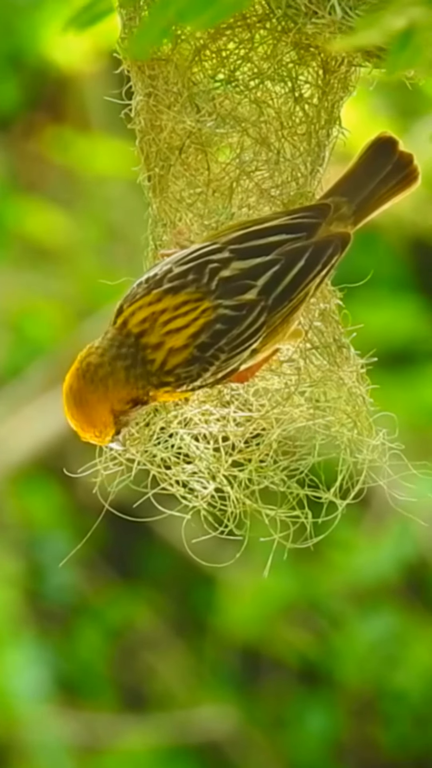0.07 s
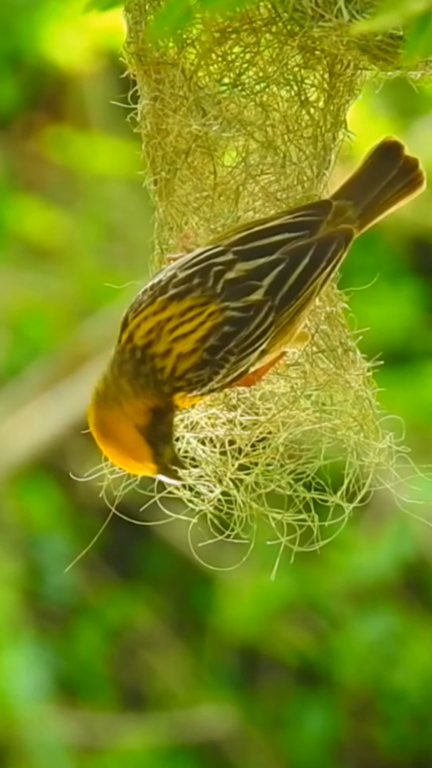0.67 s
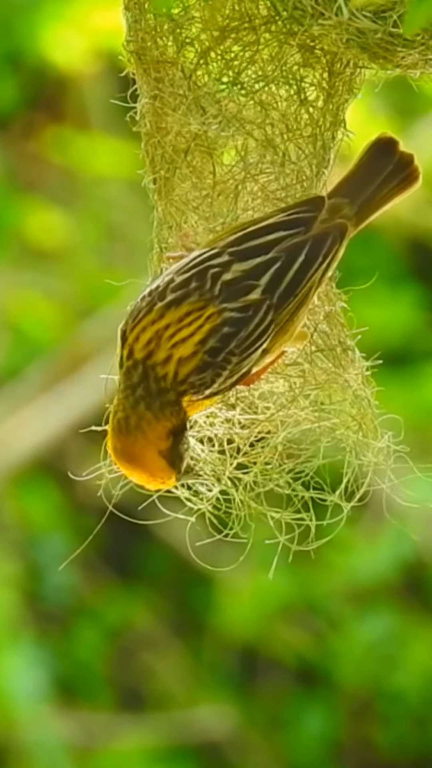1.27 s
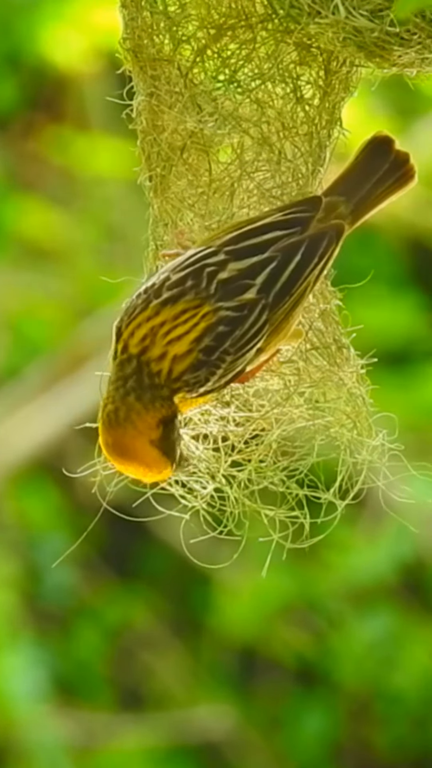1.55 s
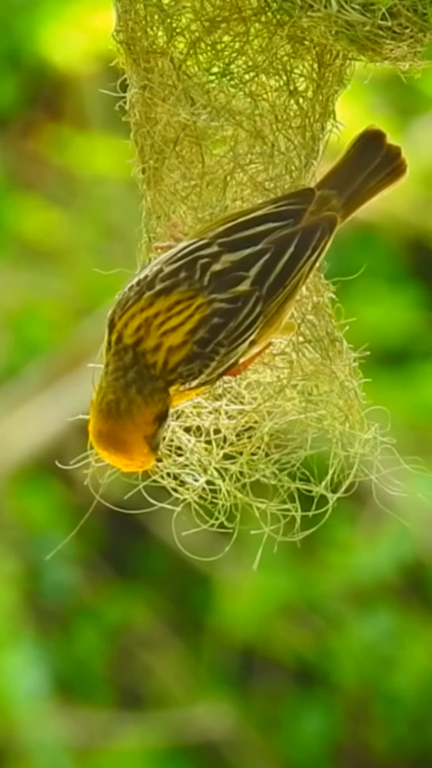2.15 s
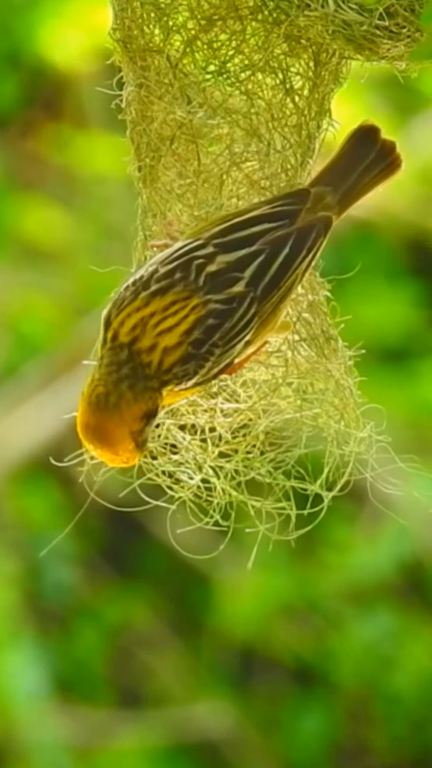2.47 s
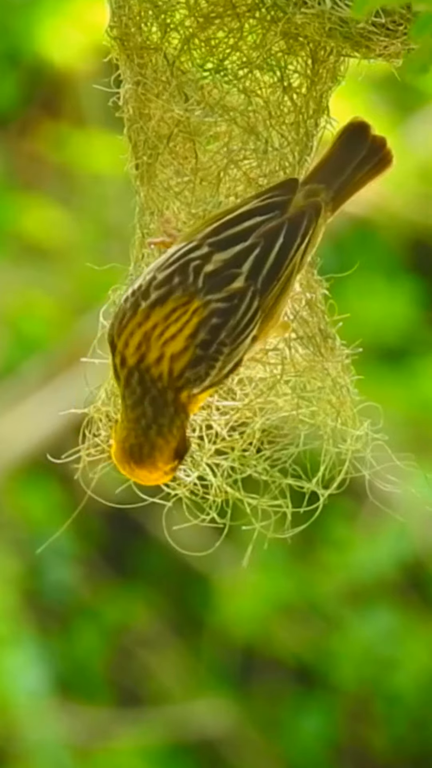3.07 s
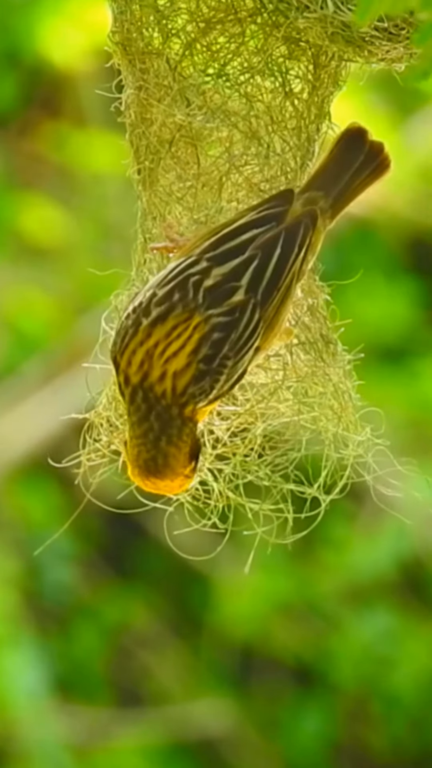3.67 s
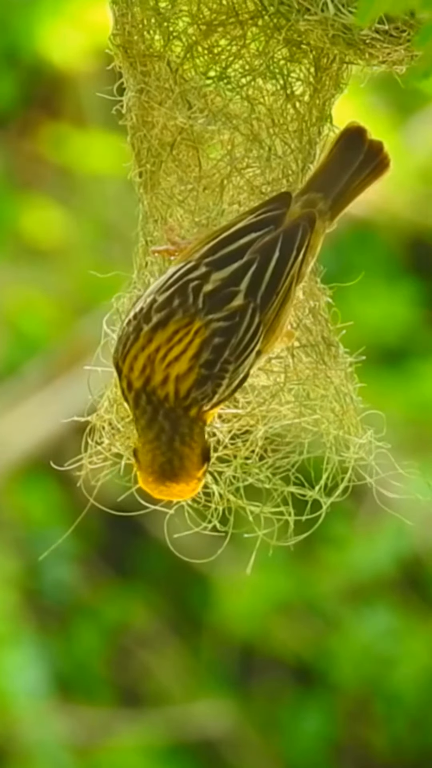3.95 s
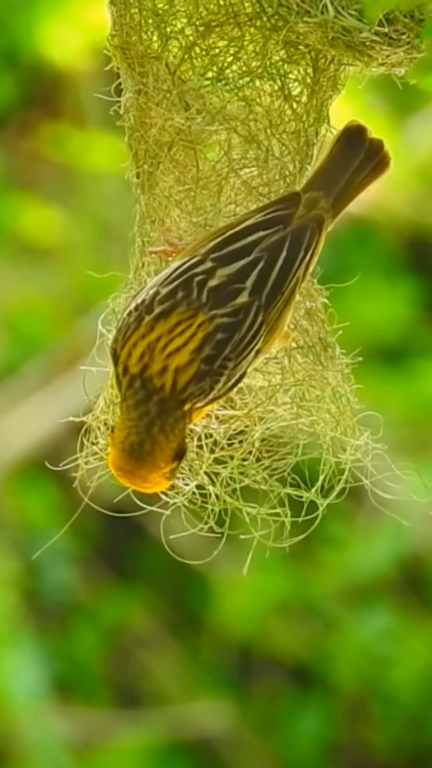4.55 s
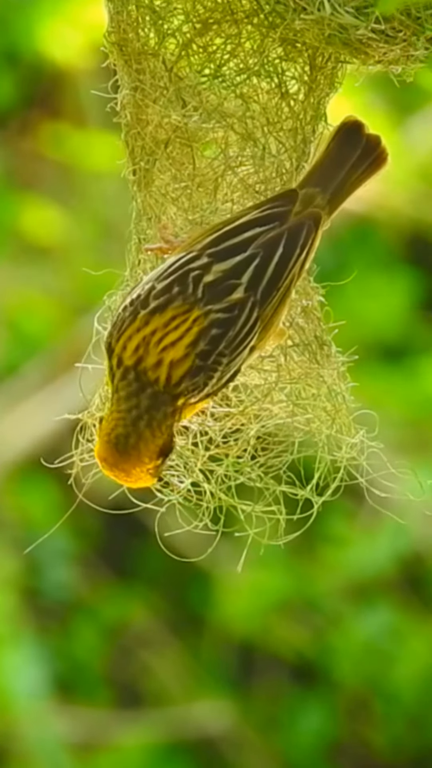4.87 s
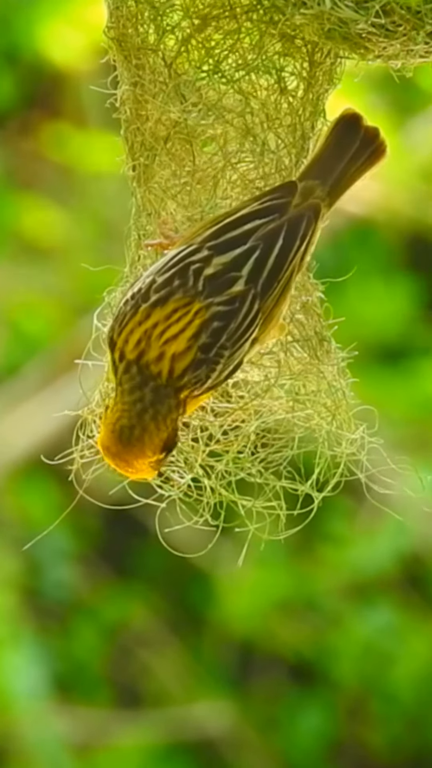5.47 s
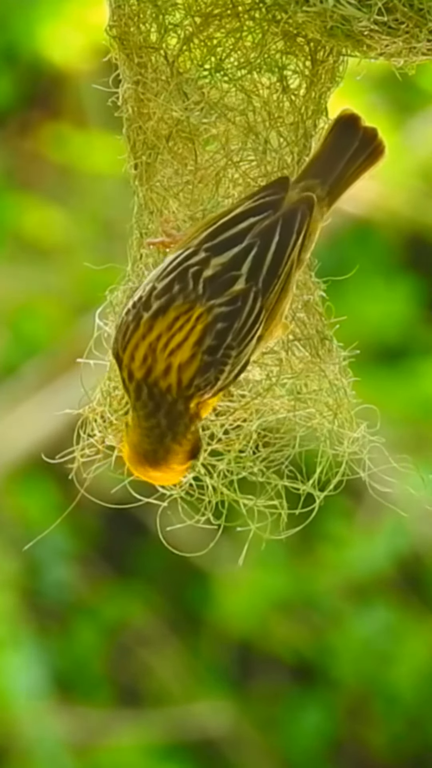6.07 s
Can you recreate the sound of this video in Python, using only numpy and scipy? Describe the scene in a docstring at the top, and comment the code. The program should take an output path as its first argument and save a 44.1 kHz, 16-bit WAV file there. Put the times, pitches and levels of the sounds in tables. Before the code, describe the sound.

Near bird whistles and trills, pauses for softer distant twitters, then sings sliding whistles with two short buzzes outdoors.

```python
"""A garden, the microphone close to a weaver bird at its hanging nest. Over faint open air, a distant
engine, far hoots and an insect ticking in bouts, the bird opens with slurred whistles and a fast trill,
then three hooked notes and a held one. Grass and leaves scatter each note; distant trees ring on.
After a pause come soft twitters and a low rattle from farther off. The second phrase is whistles again,
with two buzzy notes midway, where the two sides of the syrinx beat against each other."""
import sys
import numpy as np
from scipy import signal
from scipy.fft import rfft, irfft, next_fast_len
from scipy.io import wavfile
from scipy.ndimage import uniform_filter1d, map_coordinates

SR = 44100
rng = np.random.default_rng(int(sys.argv[2]) if len(sys.argv) > 2 else 0)


def pcm_store(signal):
    """Save signal as 16-bit PCM."""
    levels = np.round(np.clip(np.atleast_2d(signal), -1, 1) * 32767)
    wavfile.write(sys.argv[1], SR, levels.astype(np.int16).T)


N = 278271
U = np.linspace(0, 1, 41)  # progress through a note; a "place" is a point on this 0-1 scale

# Spectrum of the open air. Each row: frequency in Hz, relative level in dB.
AIR_SPECTRUM = [(13, -20), (24, 2.5), (55, -4.5), (120, -8), (180, -10), (280, -12), (640, -13.5),
                (800, -17), (1100, -20), (2500, -19), (4000, -27.5), (6000, -31.5), (10000, -39),
                (14000, -36.5), (15700, -65.5)]
# Hum of a distant engine. Each row: frequency in Hz, rms level in dB.
ENGINE_ORDERS = [(67.5, -70), (101, -67), (135, -70)]
# Ring of the foliage nearby and of the distant trees. Each row: frequency in Hz, seconds to fall 60 dB.
FOLIAGE_DECAY = [(1500, 0.19), (3000, 0.27), (6000, 0.26), (12000, 0.19)]
TREE_DECAY = [(1500, 1.7), (4000, 1.71), (7000, 1.15), (12000, 0.6)]
# Hoots of a far bird. Each row: start in seconds, relative level in dB.
HOOTS = [(.16, -60.5), (.31, -59), (.86, -59.5), (1.15, -61), (1.93, -64), (2.09, -61), (2.57, -60),
         (3.01, -61.5)]
# Bouts of insect ticking. Each row: start in seconds, end in seconds.
INSECT_BOUTS = [(0, 0.33), (1.2, 1.56), (1.994, 2.14), (2.426, 2.7), (2.946, 3.6), (4.173, 4.6),
                (5.448, 5.67), (6.02, 6.6)]
# A faint 4.6 kHz ring lingering from an earlier note, then soft twitters farther off.
# Each row: start and length in seconds, first and last pitch in Hz, relative level in dB.
SOFT_NOTES = [(0, 0.11, 4600, 4450, -60), (0.369, .016, 2820, 1940, -47.5),
              (0.643, .022, 2750, 1794, -49.5), (2.729, 0.041, 1750, 2370, -53),
              (2.786, 0.022, 4040, 3150, -59), (2.836, 0.035, 3900, 2890, -54),
              (2.859, 0.054, 1613, 2810, -50.5), (2.969, 0.026, 3950, 3580, -58.5),
              (2.998, 0.042, 1567, 2577, -48), (3.108, 0.047, 5240, 6920, -53.5),
              (3.227, 0.025, 2540, 1583, -49), (3.471, 0.055, 3400, 3246, -51.5),
              (3.555, 0.041, 4000, 2525, -54), (3.576, 0.036, 6040, 5010, -53),
              (3.622, 0.049, 4150, 2510, -55.5), (3.28, 0.23, 1940, 1818, -61),
              (3.486, .02, 1344, 1237, -53.5)]
# Runs of the rattle. Each row: start, end and stroke period in seconds, relative level in dB.
RATTLE_RUNS = [(3.051, 3.16, .0307, -44.5), (4.243, 4.53, .02725, -39)]
# The fall of one rattle stroke: four pitches in Hz.
RATTLE_STROKE_HZ = [2686, 2260, 1963, 1420]

# How the near bird's beak passes overtones and rasp. Each row: frequency in Hz, gain in dB.
BEAK_RESPONSE = [(1000, -34), (3000, -19), (6500, -3.5), (8000, -10), (9500, -5.5), (11000, -0.5),
                 (13000, 4.5), (15500, -10.5)]
# Two buzzes, a row for each side of the syrinx. Each row: start and length in seconds, top of the arch
# in Hz, its flatness, its upward lean as a share of pitch, relative level in dB.
BUZZ_VOICES = [(4.593, .084, 6090, 5.6, .11, -28.5), (4.599, 0.08, 4803, 3.4, 0.017, -30),
               (4.852, .072, 6230, 6, .05, -31.5), (4.859, 0.064, 5104, 3.3, .03, -29)]
# A trill syllable, a row for each side of the syrinx. Each row: delay and length in seconds,
# five evenly spaced pitches in Hz, four evenly spaced relative levels in dB.
TRILL_SYLLABLE = [(-.001, .0095, 3340, 4300, 5010, 5390, 6620, -9, 2, 0.91, -11.5),
                  (.0068, .015, 3810, 4696, 4280, 3214, 2230, 6, -0.5, 3.4, -15.5)]
# Single whistled glides. Each row: start and length in seconds, first and last pitch in Hz,
# steepest place, relative level in dB, loudest place.
SLURS = [(.01, 0.032, 2800, 1680, 0.63, -23.5, 0.46), (0.044, 0.03, 2010, 3015, 0, -22, 0.56),
         (3.778, 0.012, 6170, 3100, 0.62, -36, 0.75), (4.004, 0.01, 2580, 3160, .4, -29.5, 0.9),
         (4.012, 0.046, 2596, 4080, 0.67, -16.5, 0.49), (4.102, 0.048, 2570, 4060, 0.53, -17, 0.4),
         (4.976, .038, 3770, 2050, .47, -17.5, 0.35), (5.026, .034, 3790, 1986, 0.34, -18.5, 0.49),
         (5.227, 0.042, 3430, 2000, 0.5, -18.5, 0.36), (5.421, 0.043, 3520, 1946, 0.46, -19, 0.4)]
# Whistles that sink and recover. Each row: start and length in seconds, first, lowest and last pitch
# in Hz, lowest place, relative level in dB, loudest place, fade in dB.
DIPS = [(3.29, .105, 4520, 3340, 4054, .43, -32, 0.16, 2),
        (3.653, .027, 7100, 6460, 7950, 0.4, -37, 0.48, 13),
        (3.69, .027, 6850, 6760, 7500, 0.6, -36, 0.4, 9),
        (3.851, 0.086, 2514, 1260, 1280, .96, -22, .33, 29.5),
        (5.71, .08, 4440, 2950, 3320, .5, -20, 0.23, 11)]
# Low wavy whistles. Each row: start and length in seconds, centre pitch in Hz, swing as a share of it,
# highest place, number of cycles, relative level in dB.
WARBLES = [(0.109, .045, 1743, 0.2, 0.6, 0.86, -26), (3.499, .045, 1619, 0.167, .6, 0.46, -34),
           (5.524, .051, 1620, 0.115, .56, 1.32, -28.5), (5.61, 0.052, 1562, .13, 0.65, 1.4, -31)]
# The held note that ends the first phrase. Each row: time in seconds, pitch in Hz, relative level in dB.
LEDGE_PATH = [(1.146, 5688, -24.5), (1.154, 4450, -27.5), (1.16, 4130, -25), (1.178, 4355, -31),
              (1.19, 4050, -32), (1.204, 3250, -32), (1.212, 3050, -32)]
# A hook drops, then rises; a whip holds, then flicks down. Each row: delay and length in seconds,
# first and last base pitch in Hz, steepest place, relative level in dB, loudest place.
HOOK_GLIDES = [(0, .013, 3264, 1885, 0.15, 1, 0.15), (.018, .032, 1638, 2208, 0.49, -2, 0.7)]
WHIP_GLIDES = [(0, 0.032, 3970, 4073, 0.43, 0.69, 0.82), (0.0477, .026, 7580, 4190, .06, -2.25, 0.49)]
# Where hooks and whips are sung. Each row: start in seconds, pitch factor, relative level in dB.
HOOK_REPEATS = [(.871, 1.004, -23.5), (.957, 0.98, -24.5), (1.05, 1.05, -23.5)]
WHIP_REPEATS = [(5.119, .98, -19.5), (5.311, 1.02, -20)]


def amp(db):
    """Decibels to gain."""
    return 10 ** (np.asarray(db) / 20)


def along(points, hz):
    """(Hz, value) points read on a log frequency axis."""
    freqs, values = np.transpose(points)
    return np.interp(np.log(hz + 1), np.log(freqs), values)


def filtered(x, response):
    """x through a filter whose gain is response(hz)."""
    size = next_fast_len(N + SR // 2)
    return irfft(rfft(x, size) * response(np.fft.rfftfreq(size, 1 / SR)), size)[..., :N]


def add(track, start, sound):
    """Mix a sound into a track at start seconds."""
    i = min(max(round(start * SR), 0), N)
    track[i:i + len(sound)] += sound[:N - i]


def wobble(n, rate):
    """n samples of a smooth random curve, rate knots a second."""
    return map_coordinates(rng.standard_normal(int(n * rate / SR) + 4), [np.arange(n) * rate / SR])


def slur(length, pitches, levels, waver=.0072, edge_s=.0025):
    """One voice, such as a side of the syrinx: a sine gliding through pitches (Hz) and levels (dB)."""
    n = round(length * SR)
    u = np.linspace(0, 1, n)
    line = pitches[0] + (pitches[-1] - pitches[0]) * u
    bend = np.asarray(pitches) - np.linspace(pitches[0], pitches[-1], len(pitches))
    hz = line + map_coordinates(bend, [u * (len(bend) - 1)], mode="nearest")
    hz *= 1 + waver * wobble(n, 602)
    gate = np.sin(np.pi / 2 * np.clip(np.minimum(u, 1 - u) * length / edge_s, 0, 1)) ** 2
    envelope = amp(np.interp(u, np.linspace(0, 1, len(levels)), levels))
    return gate * envelope * np.sin(2 * np.pi * np.cumsum(hz) / SR)


def air(rms_db=-54.5):
    """Faint rumble and hiss of the open air all around the microphone."""
    noise = filtered(rng.standard_normal(N), lambda hz: amp(along(AIR_SPECTRUM, hz)))
    return amp(rms_db) * noise / noise.std()


def engine():
    """Three wavering orders of a distant engine."""
    t, hum = np.arange(N) / SR, np.zeros(N)
    for hz, db in ENGINE_ORDERS:
        peak = np.sqrt(2) * amp(db + 1.7 * wobble(N, 2.1))
        hum += peak * np.sin(2 * np.pi * hz * t + 1.07 * wobble(N, 2.8))
    return hum


def lingering_echo(start_db=-52, fade_db_per_s=28):
    """The echo of an earlier phrase hangs in the garden: a band of noise dying away."""
    band = [(2000, -30), (3200, -2), (4700, 0), (5600, -40)]  # Hz, dB
    wash = filtered(rng.standard_normal(N), lambda hz: amp(along(band, hz)) * (hz > 1500))
    return amp(start_db - fade_db_per_s * np.arange(N) / SR) * wash / wash.std()


def tail(decay, length_s, onset_s):
    """A diffuse echo of energy 1 that builds up, then dies at each frequency's own speed."""
    hz, t, spectrum = signal.stft(rng.standard_normal(round(length_s * SR)), SR, nperseg=256)
    fade = amp(-60 * t / along(decay, hz)[:, None])
    echo = signal.istft(spectrum * fade, SR, nperseg=256)[1]
    echo *= 1 - np.exp(-np.arange(len(echo)) / SR / onset_s)
    return echo / np.linalg.norm(echo)


def garden(song, twigs_db, foliage_db, trees_db):
    """The direct sound, quick scatter from twigs, a wash from foliage and a long ring from far trees."""
    paths = [(twigs_db, tail([(3000, .021)], length_s=.1, onset_s=.0039)),
             (foliage_db, tail(FOLIAGE_DECAY, length_s=.6, onset_s=.056)),
             (trees_db, tail(TREE_DECAY, length_s=1.5, onset_s=.15))]
    return song + sum(amp(db) * signal.fftconvolve(song, echo)[:N] for db, echo in paths)


def hoots(pitch_hz=640):
    """A far bird hoots, barely above the air."""
    song = np.zeros(N)
    pitches = pitch_hz * np.array([.97, 1.02, .98])
    for start, db in HOOTS:
        add(song, start, slur(.12, pitches, db + np.array([-7, 1, -7]), waver=.055, edge_s=.022))
    return song


def insect(strokes_per_s=78):
    """An insect some way off: each wing stroke is a tiny falling chirp; a bout swells at its start."""
    ticks = np.zeros(N)
    for start, end in INSECT_BOUTS:
        for onset in np.arange(start, end, 1 / strokes_per_s):
            growth = 1 - .62 * np.exp(-(onset - start) / .037)
            gain = growth * amp(-60 + rng.normal(0, 1))
            add(ticks, onset, gain * slur(.00654, [7100, 6000, 5100], [-5, 1, -3], waver=.045))
    return ticks


def soft_notes(swell_db=7.5):
    """The faint ring of an earlier note, then soft twitters farther off: plain glides that grow."""
    song = np.zeros(N)
    for start, length, first_hz, last_hz, db in SOFT_NOTES:
        pitches = first_hz * (last_hz / first_hz) ** U
        add(song, start, slur(length, pitches, db + swell_db * (U - .5), waver=.013, edge_s=.0024))
    return song


def rattle(arch_db=4):
    """Runs of soft, rough, quickly falling strokes away from the microphone, strongest midway."""
    song = np.zeros(N)
    stroke_db = np.array([2.5, 4, -5.5, -.5])
    for start, end, period, db in RATTLE_RUNS:
        onsets = np.arange(start, end, period)
        for onset, off_centre in zip(onsets, np.linspace(-1, 1, len(onsets))):
            levels = db - arch_db * off_centre ** 2 + stroke_db
            add(song, onset, slur(.01083, RATTLE_STROKE_HZ, levels, waver=.051))
    return song


def nest(song, bounce_db=-7, delay_s=.00145):
    """A bounce off the nest just behind the beak: glides flutter as they cross its peaks and notches."""
    return filtered(song, lambda hz: 1 + amp(bounce_db) * np.exp(-2j * np.pi * hz * delay_s))


def voiced(tone, second_db, third_db, rasp_db, taut_hz=3700):
    """At high pitch taut membranes bend the wave into overtones and sum tones; the air jet adds rasp."""
    taut = filtered(tone, lambda hz: 1 / np.sqrt(1 + (taut_hz / (hz + 1)) ** 10))
    envelope = np.sqrt(np.abs(uniform_filter1d(taut ** 2, size=128)) * 2) + 1e-6
    wave = taut / envelope
    overtones = amp(second_db) * (wave ** 2 - .5) + amp(third_db) * (wave ** 3 - 3 / 4 * wave)
    rasp = amp(rasp_db) * wave * rng.standard_normal(N)
    colour = envelope * (overtones + rasp)
    return tone + filtered(colour, lambda hz: amp(along(BEAK_RESPONSE, hz)) * (hz > 1000))


def buzzes(foot_hz=3334, droop_db=2):
    """The two sides of the syrinx arch in pitch and beat against each other."""
    song = np.zeros(N)
    for start, length, top_hz, flatness, lean, db in BUZZ_VOICES:
        droop = np.abs(2 * U - 1) ** flatness
        arch = top_hz - (top_hz - foot_hz) * droop
        add(song, start, slur(length, arch * (1 + lean * (U - .5)), db - droop_db * droop, waver=.011))
    return amp(-2.9) * voiced(song, second_db=-12, third_db=-20.5, rasp_db=-23)


def trill(count=11, start_s=.2093, period_s=.0585):
    """In each syllable one side flicks up, then the other arches over and falls; no two are alike."""
    song = np.zeros(N)
    onsets = start_s + period_s * np.arange(count)
    onsets[-1] += .0047  # the last syllable hangs back
    for onset in onsets:
        for delay, length, *shape in TRILL_SYLLABLE:
            detune = 1 + .03 * rng.standard_normal() + .03 * rng.standard_normal(5)
            pitches = np.array(shape[:5]) * detune
            levels = np.array(shape[5:]) - 28.5 + 2 * rng.standard_normal(4)
            add(song, onset + delay, slur(length, pitches, levels, waver=.022, edge_s=.0011))
    return voiced(song, second_db=-18, third_db=-26, rasp_db=-20.5)


def glide(first_hz, last_hz, steepest, steepness=5.5):
    """An S-shaped path from one pitch to another."""
    path = 1 / (1 + np.exp(-steepness * (U - steepest)))
    return first_hz + (last_hz - first_hz) * (path - path[0]) / (path[-1] - path[0])


def swell(loudest, rise_db, fall_db, curve=2.22):
    """Level in dB of a note that swells to its crest and fades."""
    crest = np.clip(loudest, .05, .95)
    away = np.abs(U - crest) / np.where(U < crest, crest, 1 - crest)
    return -np.where(U < crest, rise_db, fall_db) * away ** curve


def whistle(length, pitches, db, loudest):
    """One clean note that swells and fades."""
    return slur(length, pitches, db + swell(loudest, rise_db=15.5, fall_db=19.5), waver=.0057)


def slurs():
    """Single glides, up or down."""
    song = np.zeros(N)
    for start, length, first_hz, last_hz, steepest, db, loudest in SLURS:
        add(song, start, whistle(length, glide(first_hz, last_hz, steepest), db, loudest))
    return song


def dips(hold_share=.28):
    """The pitch holds for a share of the descent, eases down to its lowest point and eases up again."""
    song = np.zeros(N)
    for start, length, first_hz, low_hz, last_hz, lowest, db, loudest, fade_db in DIPS:
        ramp = np.interp(U, [hold_share * lowest, lowest, 1], [1, 0, 1])
        depth_hz = np.where(U < lowest, first_hz, last_hz) - low_hz
        pitches = low_hz + depth_hz * np.sin(np.pi / 2 * ramp) ** 2
        levels = db + swell(loudest, rise_db=21, fall_db=fade_db)
        add(song, start, slur(length, pitches, levels, waver=.0056))
    return song


def warbles():
    """Low notes that ride one wave of pitch, loudest on its top."""
    song = np.zeros(N)
    for start, length, hz, swing, highest, cycles, db in WARBLES:
        pitches = hz * (1 + swing * np.cos(2 * np.pi * cycles * (U - highest)))
        levels = db + swell(highest, rise_db=22, fall_db=8.5)
        add(song, start, slur(length, pitches, levels, waver=.021))
    return song


def ledge():
    """A note that drops onto a held pitch, then slides off it."""
    song = np.zeros(N)
    times, hz, db = np.transpose(LEDGE_PATH)
    length = times[-1] - times[0]
    t = times[0] + length * U
    add(song, times[0], slur(length, np.interp(t, times, hz), np.interp(t, times, db), waver=.007))
    return amp(2.5) * song


def quaver(start_s=4.728, length_s=.071, flutter_hz=105, flutter_share=.14):
    """A rising note that shakes at first and steadies as it grows loud."""
    song = np.zeros(N)
    shake = flutter_share * np.clip(1 - U / .59, 0, 1) * np.sin(2 * np.pi * flutter_hz * length_s * U)
    pitches = glide(first_hz=2004, last_hz=2910, steepest=.38) * (1 + shake)
    add(song, start_s, whistle(length_s, pitches, db=-19, loudest=.71))
    return song


def figures(repeats, glides):
    """A figure of two glides, repeated at slightly different pitch and strength."""
    song = np.zeros(N)
    for start, factor, db in repeats:
        for delay, length, first_hz, last_hz, steepest, glide_db, loudest in glides:
            pitches = factor * glide(first_hz, last_hz, steepest)
            add(song, start + delay, whistle(length, pitches, db + glide_db, loudest))
    return song


def whistles():
    """The near bird's clean notes, from one side of the syrinx, with faint overtones."""
    song = slurs() + dips() + warbles() + ledge() + quaver()
    song += figures(HOOK_REPEATS, HOOK_GLIDES) + figures(WHIP_REPEATS, WHIP_GLIDES)
    return amp(-1) * voiced(song, second_db=-26.5, third_db=-24, rasp_db=-52.5)


def scene():
    """The weaver is close and fairly dry, the others farther and wetter; both channels hear the same."""
    near = garden(nest(whistles() + buzzes() + trill()), twigs_db=-9.5, foliage_db=-12, trees_db=-24.5)
    far = garden(soft_notes() + rattle() + insect(), twigs_db=-3.5, foliage_db=-8, trees_db=-8)
    far_hoots = garden(hoots(), twigs_db=-5.5, foliage_db=-11, trees_db=-17)
    mono = near + far + far_hoots + lingering_echo() + air() + engine()
    return np.array([mono, mono])


def record(dry, hiss_db=-83, top_hz=15700):
    """Each microphone channel adds a trace of its own hiss; nothing passes above the band limit."""
    hiss = amp(hiss_db) * rng.standard_normal(dry.shape)
    return filtered(dry + hiss, lambda hz: hz < top_hz)


dry = scene()
out = record(dry)
pcm_store(out)
```